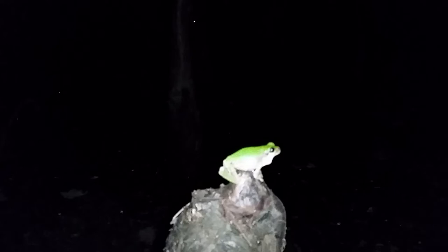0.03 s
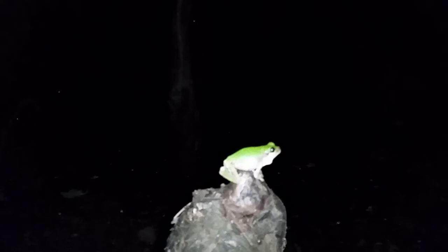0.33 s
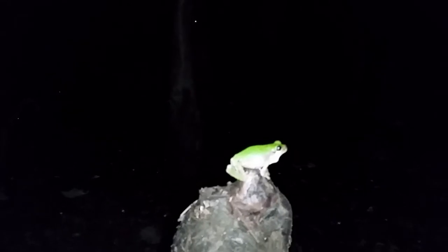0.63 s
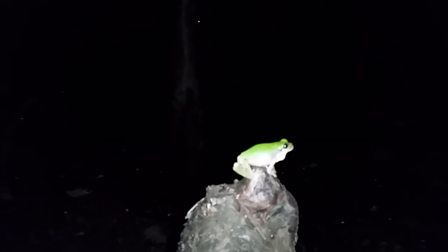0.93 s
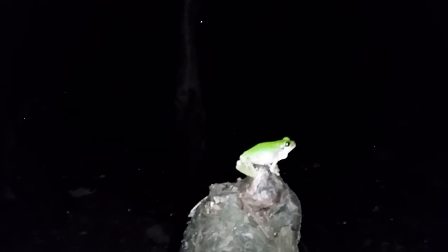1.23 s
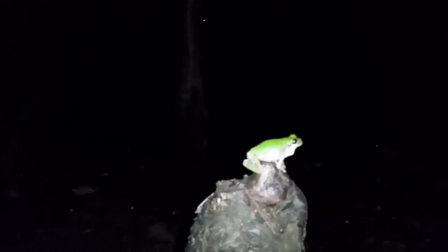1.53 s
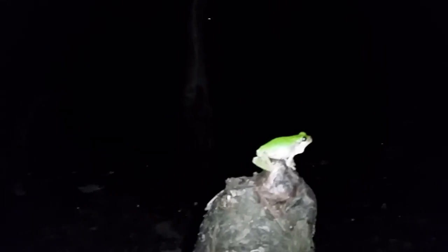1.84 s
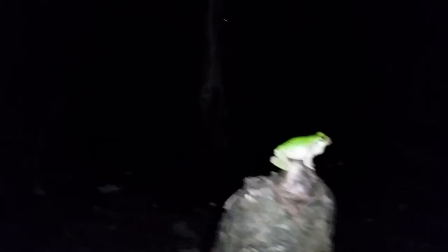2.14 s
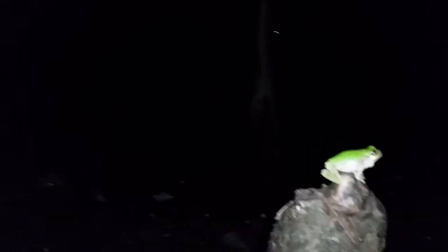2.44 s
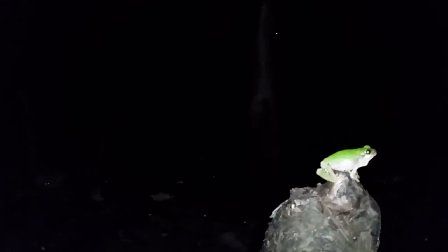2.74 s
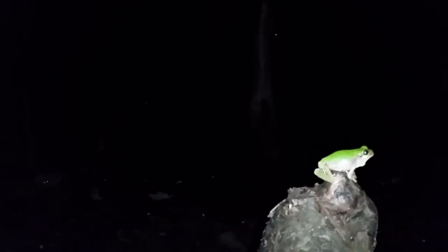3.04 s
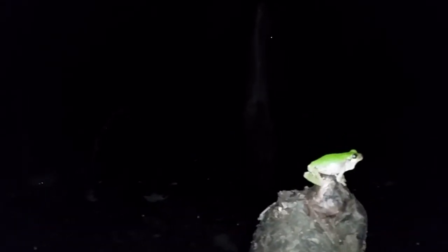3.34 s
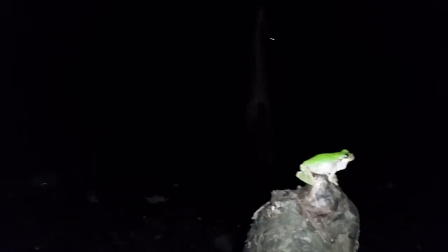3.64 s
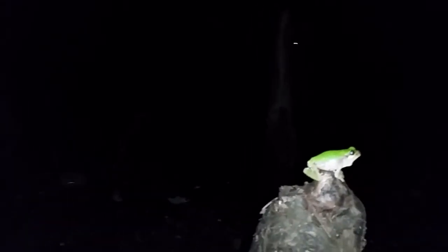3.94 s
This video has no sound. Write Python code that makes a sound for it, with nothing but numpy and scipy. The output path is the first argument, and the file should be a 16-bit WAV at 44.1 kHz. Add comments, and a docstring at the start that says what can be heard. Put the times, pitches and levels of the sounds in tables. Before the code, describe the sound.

A chorus of tree frogs, one close by, over trilling crickets in a night swamp.

```python
"""Swamp at night

A crowd of tree frogs taps out short pulsed throat notes among the trees, one nearer than the rest.
Crickets trill with their wings on the right and other insects buzz on the left, over a faint rumble.
There is one sharp tick, and a hand bumps the camera a few times, once with a duller tick."""
import sys
import numpy as np
from scipy import signal
from scipy.fft import rfft, irfft
from scipy.io import wavfile
from scipy.ndimage import uniform_filter1d, map_coordinates

SR = 44100
rng = np.random.default_rng(int(sys.argv[2]) if len(sys.argv) > 2 else 0)


def master_out(mix):
    """Clip the mix to full scale and print it as 16-bit PCM to the path in sys.argv[1]."""
    frames = np.transpose(np.atleast_2d(mix))
    ceiling = np.clip(frames, -1, 1)
    pcm = np.round(ceiling * 32767).astype(np.int16)
    wavfile.write(sys.argv[1], SR, pcm)


N = 176400


def frog_note(hz, rough, length_s=0.039, pulse_hz=125.2, glide_hz_per_s=97):
    """One frog note: the throat tone swells and fades, throbbing with the pulses of the larynx."""
    t = np.arange(int(length_s * SR)) / SR
    speed, phase, pulse_phase = rng.standard_normal(), rng.random(), rng.random()
    throb = 1 + rough * np.cos(2 * np.pi * (pulse_hz * (1 + 0.155 * speed) * t + pulse_phase))
    pitch = hz + glide_hz_per_s * (t - length_s / 2)
    return np.hanning(len(t)) * throb * np.sin(2 * np.pi * (phase + np.cumsum(pitch) / SR))


# Notes of the lead frog (centre time [s], level [dB])
LEAD_NOTES = [(0.118, -41), (.242, -39), (.384, -41), (.507, -37), (0.65, -40), (.786, -40), (.919, -40.5),
              (1.051, -37.5), (1.186, -37.5), (1.333, -40), (1.458, -34), (1.612, -36.5), (1.793, -39.5),
              (2.069, -40)]
# Notes of its neighbours (centre time [s], pitch [Hz], level [dB])
NEIGHBOUR_NOTES = [(.095, 2486, -43), (.236, 2485, -40), (.372, 2485, -49), (.515, 2436, -45),
                   (.645, 2480, -46), (.787, 2475, -42), (1.456, 2450, -41), (1.62, 2427, -44),
                   (1.795, 2455, -72.5), (3.18, 2200, -56), (3.35, 2332, -44.5), (3.565, 2350, -49),
                   (3.70, 2290, -41.5), (3.766, 2283, -40)]

def near_frogs(lead_hz=2352, rough=0.095, wet_db=-8):
    """The lead frog calls about seven times a second for two seconds; neighbours join in and call on."""
    calls = np.zeros(N)
    for time, db in LEAD_NOTES:
        add_centred(calls, time, undb(db) * frog_note(lead_hz, rough))
    for time, hz, db in NEIGHBOUR_NOTES:
        add_centred(calls, time, undb(db) * frog_note(hz, rough))
    return among_trees(calls, wet_db)


# Fader and pitch ride of the chorus (time [s], level [dB], centre pitch [Hz])
CHORUS_RIDE = [(0, -44.5, 2422), (.8, -44.5, 2418), (1.6, -46, 2400), (2.3, -46.3, 2390), (2.9, -48, 2395),
               (3.3, -46.5, 2369), (4, -46, 2365)]
# Far frogs merged into a bed (frequency [Hz], relative level [dB])
FAR_FROG_SPECTRUM = [(1600, -43), (1950, -24), (2170, -16.5), (2290, -7), (2348, 1.5), (2400, -7),
                     (2452, 1), (2600, -33.5), (2820, -25), (2950, -57)]

def frog_chorus(count=40, notes_per_s=10.5, size_split_hz=52, spread_hz=40):
    """Many frogs, larger ones lower and smaller ones higher, each at its own tempo, blurred by echoes."""
    calls, centre_hz = np.zeros(N), curve(CHORUS_RIDE, column=2)
    for k in range(count):
        offset_hz = (-1) ** k * size_split_hz + spread_hz * np.arctanh(2 * (k + .5) / count - 1)
        gaps, accents_db, detunes = rng.standard_normal((3, 64))
        beats = np.cumsum(1 + .15 * gaps) - 1 - rng.random()
        tempo = notes_per_s * (1 + 0.11 * rng.standard_normal())
        for time, db, detune in zip(beats / tempo, accents_db, detunes):
            hz = centre_hz[np.clip(int(time * SR), 0, N - 1)] + offset_hz + 10 * detune
            add(calls, time, undb(db) * frog_note(hz, rough=.15))
    crowd = unit(among_trees(calls, wet_db=-3)) * undb(curve(CHORUS_RIDE))
    return crowd + undb(-52.5) * wash(FAR_FROG_SPECTRUM)


# Foreground crickets (pitch [Hz], wing strokes [1/s], relative level [dB])
NEAR_CRICKETS = [(5306, 63, -3), (5799, 75.3, -2)]
# Bed of far crickets (frequency [Hz], relative level [dB])
FIELD_SPECTRUM = [(4100, -31), (4600, -13), (4950, -7.5), (5250, 0), (5850, -1.5), (6020, -10.5),
                  (6200, -22), (6500, -26)]
# Fader ride of both together (time [s], level [dB])
CRICKET_RIDE = [(0, -53.5), (.6, -56), (1.4, -54.5), (2.3, -54), (2.9, -54.5), (3.4, -53.5), (4, -51.5)]

def crickets(sag_hz=313, near_db=-5.5):
    """Each wing stroke is a short falling tone; a field of far crickets merges behind the near ones."""
    trills = np.zeros(N)
    for hz, rate, db in NEAR_CRICKETS:
        stroke = (rng.random() + np.cumsum(rate * (1 + 0.0037 * drift(7.2))) / SR) % 1
        pitch = hz - sag_hz * (stroke - .5) + 35 * drift(500)
        envelope = undb(db + drift(15)) * np.sin(np.pi * stroke) ** 4
        trills += envelope * np.sin(2 * np.pi * np.cumsum(pitch) / SR)
    near = undb(near_db) * unit(among_trees(trills, wet_db=-9))
    return unit(near + wash(FIELD_SPECTRUM)) * undb(curve(CRICKET_RIDE)) * pan(-7.5)


# Hand bumps (centre time [s], pitch [Hz], length [s], level [dB])
HAND_BUMPS = [(1.85, 170, 0.03, -50.5), (2.085, 134, 0.014, -47), (2.157, 107, 0.037, -42.5),
              (2.174, 180, 0.021, -43), (2.181, 226.4, 0.084, -49.5), (2.388, 162, 0.014, -41.5),
              (3.652, 102, 0.02, -40.5), (3.82, 59, 0.057, -52), (3.918, 93, 0.028, -47)]

def hand_bumps():
    """Soft low thuds carried through the camera body, dead centre."""
    thuds = np.zeros(N)
    for time, hz, length, db in HAND_BUMPS:
        t = np.arange(int(length * SR)) / SR - length / 2
        add_centred(thuds, time, undb(db) * np.hanning(len(t)) * np.sin(2 * np.pi * hz * t))
    return thuds


# Tick hits (time [s], centre [Hz], half-width [octaves], decay [s], level [dB], left minus right [dB])
TICK_HITS = [(.9085, 11400, .19, .0024, -41.5, -8), (2.166, 950, .5, .0035, -49, 1)]

def ticks(wet_db=-15):
    """A sharp tick and a duller one: fast-dying bands of noise with a faint echo."""
    hits, t = np.zeros((2, N)), np.arange(N) / SR
    for time, hz, width, decay, db, pan_db in TICK_HITS:
        band = [(hz * 2 ** (k * width), -3 * k * k) for k in range(-3, 4)]
        add(hits, time, wash(band) * np.exp(-t / decay) * undb(db) * pan(pan_db))
    return hits + undb(wet_db) * woods(hits.mean(axis=0))


# Insect beds: buzz, shrill crickets, their overtone, hiss (frequency [Hz], relative level [dB])
BUZZ_SPECTRUM = [(3000, -18), (3450, -14), (3850, -2), (4100, 0), (4500, -12.5), (5000, -11)]
SHRILL_SPECTRUM = [(5250, -23), (5600, 5.5), (5870, 6.5), (6050, 2.5), (6300, -23)]
OVERTONE_SPECTRUM = [(10300, -18), (11100, -15), (11750, 3.5), (12300, -16.5), (13200, -13)]
HISS_SPECTRUM = [(2800, -25), (6500, -12), (7250, -24), (7650, 4), (8050, 5), (8450, -15), (9300, 0),
                 (10000, -9.5), (12000, 9.5), (13200, 3), (14300, -2.5)]
# Fader ride of the overtone; the shrill band rides above it (time [s], level [dB])
OVERTONE_RIDE = [(0, -76), (.4, -76), (1.5, -84), (1.95, -67.5), (2.37, -65), (2.85, -71.5), (3.4, -74.5),
                 (4, -68)]
# Thin high chirps (centre time [s], pitch [Hz], length [s], level [dB])
HIGH_CHIRPS = [(.1, 12450, .09, -65), (2.385, 12550, .06, -68)]

def far_insects(shrill_boost_db=10):
    """A fluttering buzz on the left, shrill crickets that swell and fade, a thin hiss and two chirps."""
    buzz = wash(BUZZ_SPECTRUM) * undb(-67 + 0.89 * drift(110)) * pan(9.5)
    shrill = undb(shrill_boost_db) * wash(SHRILL_SPECTRUM) * pan(-8.5)
    overtone = wash(OVERTONE_SPECTRUM) * pan(-0.93)
    ride = undb(curve(OVERTONE_RIDE) + 2.3 * drift(90))
    hiss = undb(-68.5) * wash(HISS_SPECTRUM)
    bed = buzz + (shrill + overtone) * ride + hiss
    for time, hz, length, db in HIGH_CHIRPS:
        swell = np.hanning(int(length * SR))
        tone = np.sin(2 * np.pi * np.cumsum(hz + 150 * drift(740)) / SR)
        add_centred(bed, time, undb(db) * swell * tone[:len(swell)])
    return bed


# Low background bed (frequency [Hz], relative level [dB])
RUMBLE_SPECTRUM = [(25, -8), (45, -5.5), (95, 0), (180, -7), (350, -12.5), (630, -16), (1000, -23.5),
                   (1560, -29.5), (1800, -31)]

def rumble(crossover_hz=195, level_db=-57):
    """Low distant noise: the bass is narrow and leans right, the rest is wide and leans left."""
    lowpass = signal.butter(2, crossover_hz, "low", fs=SR, output="sos")
    highpass = signal.butter(2, crossover_hz, "high", fs=SR, output="sos")
    mid, side = wash(RUMBLE_SPECTRUM)
    bass = signal.sosfilt(lowpass, [mid + 0.53 * side, mid - 0.53 * side]) * pan(-2.7)
    upper = 1.29 * signal.sosfilt(highpass, wash(RUMBLE_SPECTRUM)) * pan(2.36)
    return unit(bass + upper) * undb(level_db + .5 * drift(4.6))


def woods(x, t60_s=0.91):
    """Diffuse echoes from trunks and water, different at each ear."""
    t = np.arange(SR // 2) / SR
    tail = rng.standard_normal((2, len(t))) * np.exp(-np.log(1000) * t / t60_s)
    return unit(irfft(rfft(x) * rfft(tail, N), N)) * np.std(x)


def among_trees(x, wet_db, lag_s=.000042):
    """A source a little left of centre reaches the right side later; the woods add their echoes."""
    right = map_coordinates(x, [np.arange(N) - lag_s * SR], mode="nearest")
    return np.array([x, right]) + undb(wet_db) * woods(x)


def wash(spectrum):
    """Wide stereo noise with a given spectrum, falling 60 dB an octave beyond its ends."""
    hz, db = np.array(spectrum).T
    octave = np.log2(np.fft.rfftfreq(N, 1 / SR) + 1)
    beyond = np.abs(octave - np.clip(octave, np.log2(hz[0]), np.log2(hz[-1])))
    gain = undb(np.interp(octave, np.log2(hz), db) - 60 * beyond)
    return unit(irfft(rfft(rng.standard_normal((2, N))) * gain, N))


def drift(rate_hz):
    """Smooth random modulation at rms 1."""
    hold = int(SR / rate_hz)
    steps = np.repeat(rng.standard_normal(N // hold + 1), hold)
    return unit(uniform_filter1d(steps, hold)[:N])


def undb(db):
    """Decibels to gain."""
    return 10 ** (np.asarray(db) / 20)


def unit(x):
    """Scale to rms 1."""
    return x / np.sqrt(np.mean(x ** 2))


def curve(table, column=1):
    """One column of a time table, joined by straight lines."""
    rows = np.array(table)
    return np.interp(np.arange(N) / SR, rows[:, 0], rows[:, column])


def pan(db):
    """Stereo gains for a level difference; positive is left."""
    return undb(np.array([[db], [-db]]) / 2)


def add(track, start_s, sound):
    """Mix a sound in from a start time."""
    i = int(start_s * SR)
    a, b = max(i, 0), min(i + sound.shape[-1], N)
    if b > a:
        track[..., a:b] += sound[..., a - i:b - i]


def add_centred(track, centre_s, sound):
    """Mix a sound in with its middle at a time."""
    add(track, centre_s - sound.shape[-1] / SR / 2, sound)


def scene():
    """The mix: frogs a little left, crickets right, far insects, rumble, bumps and ticks."""
    frogs = (near_frogs() + frog_chorus()) * pan(2.5)
    return frogs + crickets() + far_insects() + rumble() + hand_bumps() + ticks()


def record(dry, open_s=0.0776, fade_s=0.0089, top_hz=14600):
    """The microphone opens a moment late and cuts the top."""
    fade_in = np.clip((np.arange(N) / SR - open_s) / fade_s + .5, 0, 1)
    high_cut = signal.ellip(10, .2, 70, top_hz, fs=SR, output="sos")
    return signal.sosfilt(high_cut, dry * fade_in)


dry = scene()
out = record(dry)
master_out(out)
```